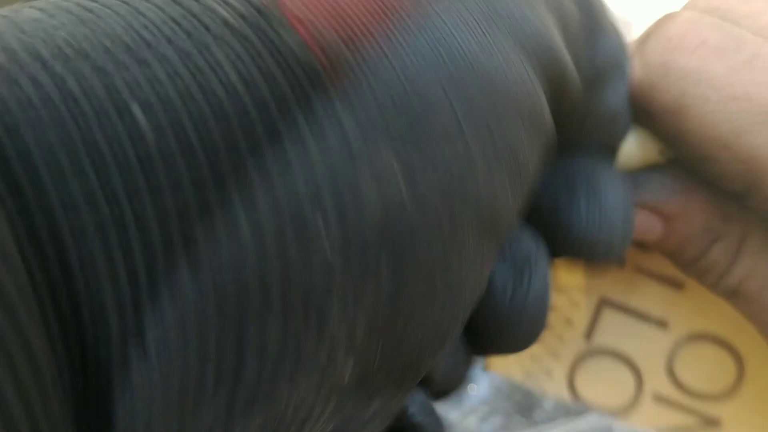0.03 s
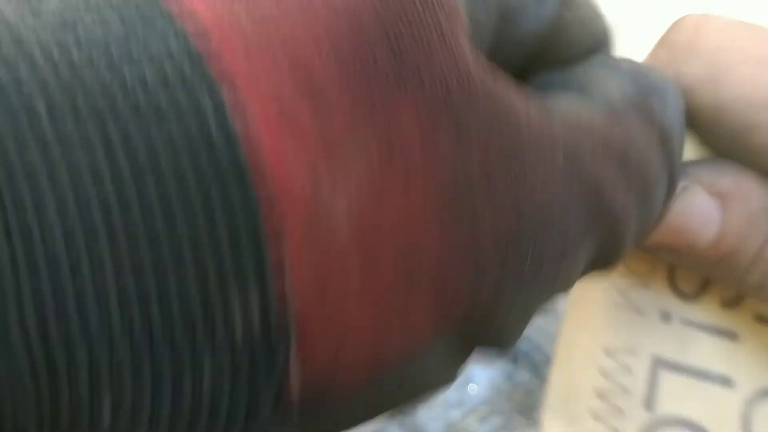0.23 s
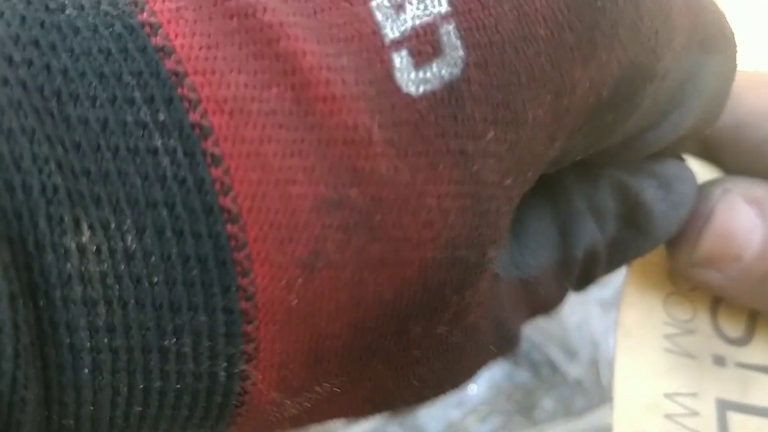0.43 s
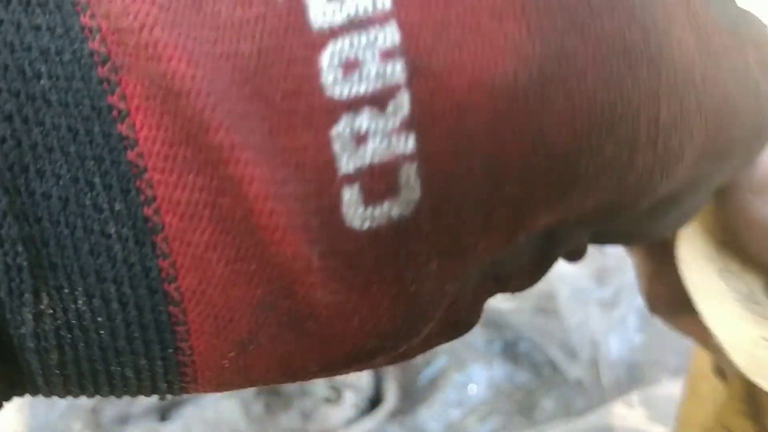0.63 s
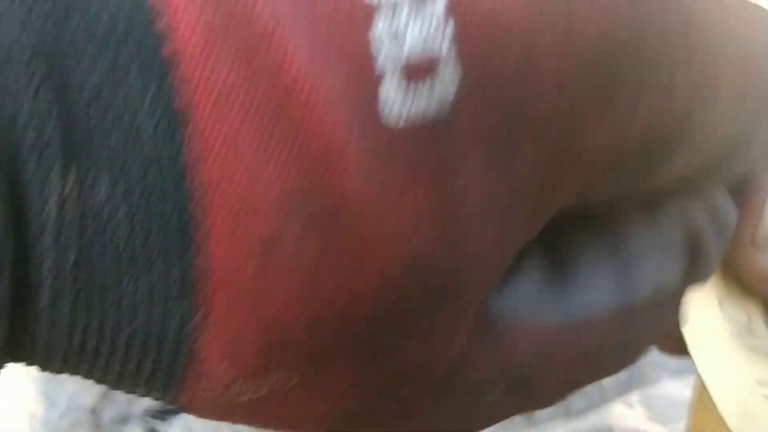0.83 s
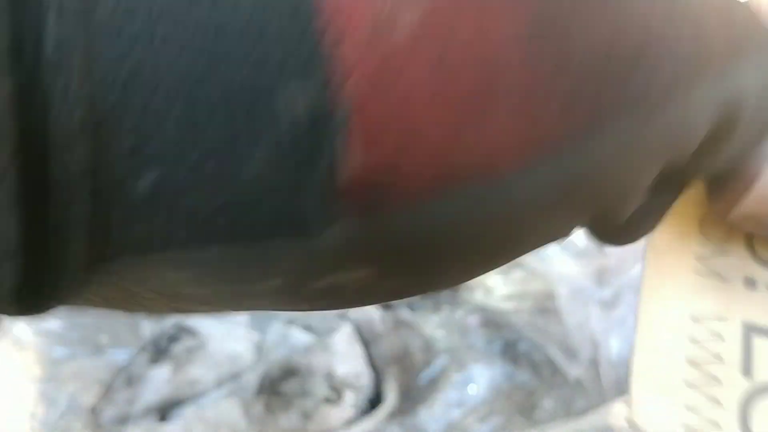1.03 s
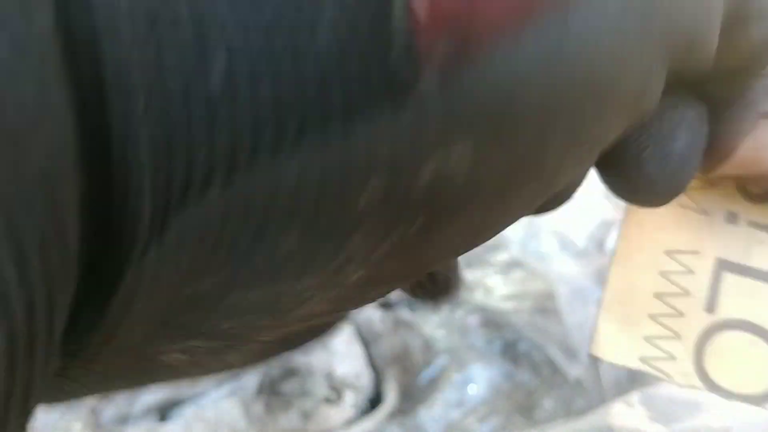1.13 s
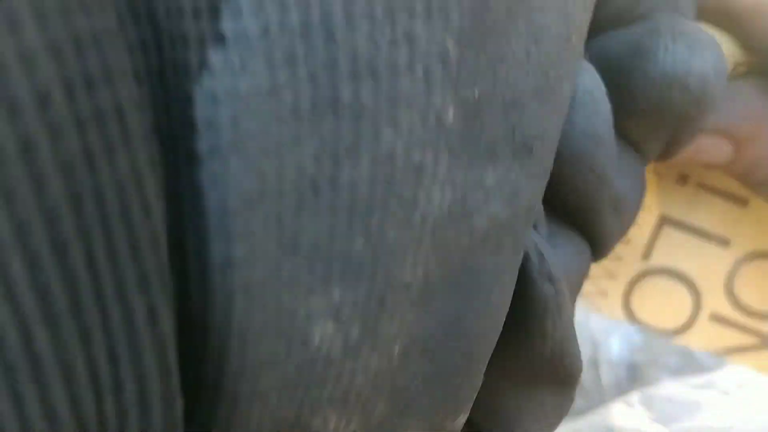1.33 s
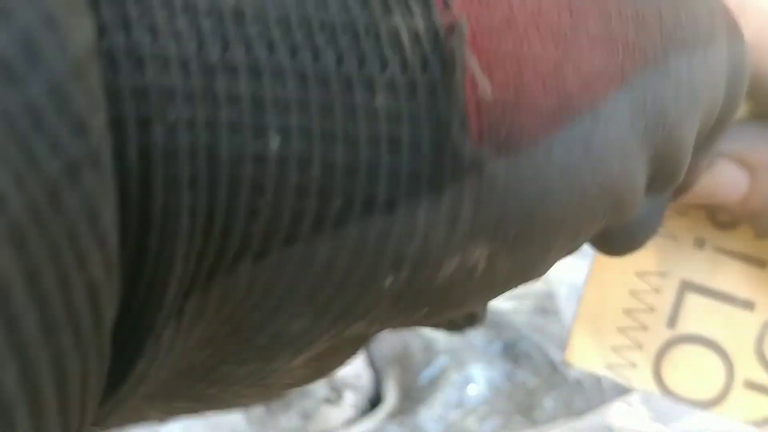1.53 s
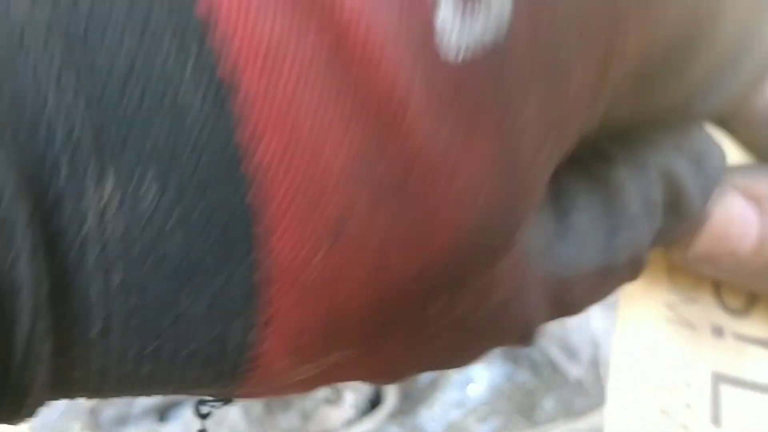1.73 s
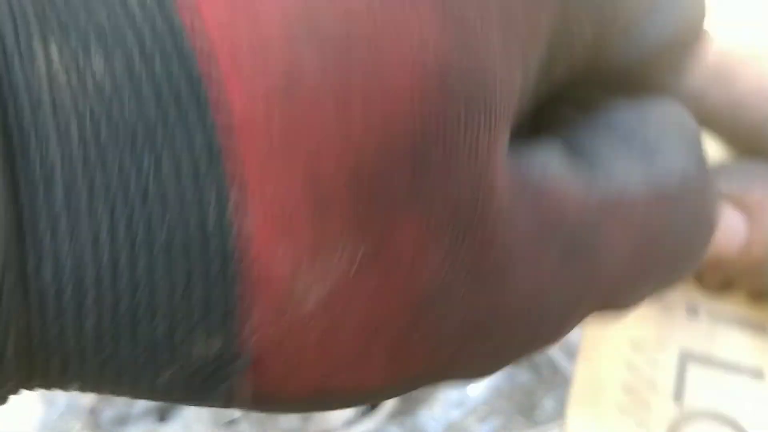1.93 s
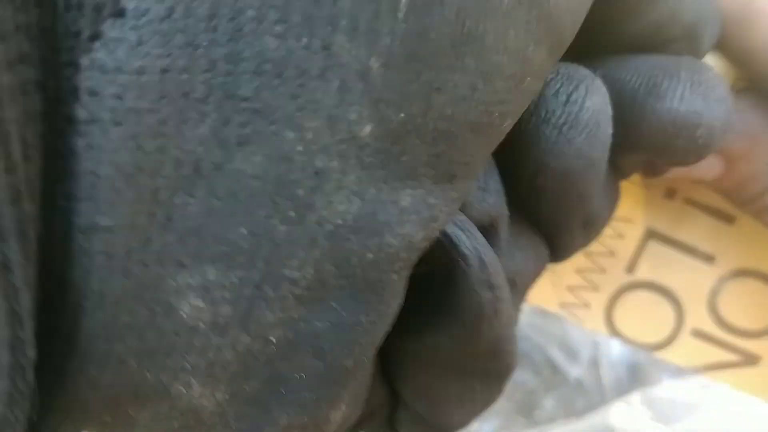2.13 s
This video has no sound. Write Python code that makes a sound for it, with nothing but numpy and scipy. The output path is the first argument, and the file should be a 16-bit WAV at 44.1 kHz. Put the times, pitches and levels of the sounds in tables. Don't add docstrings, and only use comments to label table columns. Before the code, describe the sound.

Fine sandpaper rubs a steel pin held in a gloved hand, very close in stereo. Gritty, mid-toned rasps with light hiss run from 0.05 to 0.5 s, with a brief dip near 0.2. Softer rubbing and dull glove thumps follow around 0.6-0.75, then scrapes at 0.87-1.4, a stuttering creep, a long stroke at 1.5-1.8, a quick bite at 1.83, and a strong last stroke at 1.9-2.17. Faint garage hush fills the gaps.

```python
import sys
import numpy as np
from scipy import signal
from scipy.fft import rfft, irfft
from scipy.io import wavfile

SR = 44100
rng = np.random.default_rng(int(sys.argv[2]) if len(sys.argv) > 2 else 0)


def to_wav(sig):
    pcm = np.clip(np.atleast_2d(sig), -1, 1) * 32767
    pcm = np.round(pcm).astype(np.int16)
    wavfile.write(sys.argv[1], SR, pcm.T)


def gain_from_decibels(decibels):
    exponent = np.asarray(decibels, float) / 20
    return 10 ** exponent


N = 96182
TIME_S = np.arange(N) / SR


def rms_one(x):
    return x / np.sqrt(np.mean(x ** 2) + 1e-20)


def at_hz(points, hz):
    table_hz, table_db = np.transpose(points)
    return np.interp(np.log(hz), np.log(table_hz), table_db)


def drift(rate_hz):
    r = np.exp(-40 * np.pi * rate_hz / SR)
    noise = rng.standard_normal(N // 20 + 3002)
    slow = signal.lfilter([1], [1, -2 * r, r * r], noise)[3000:]
    return np.interp(np.arange(N) / 20, np.arange(len(slow)), rms_one(slow))


def resonance(x, hz, width_hz):
    r = np.exp(-np.pi * width_hz / SR)
    top = np.array([1, 0, -1]) * (1 - r * r) / 2
    return signal.lfilter(top, [1, -2 * r * np.cos(2 * np.pi * hz / SR), r * r], x)


def pan(side_db):
    return gain_from_decibels(np.array([[0.5], [-0.5]]) * side_db)


def pair(near, far, alike, side_db):
    right = alike * near + np.sqrt(1 - alike ** 2) * far
    return np.array([near, right]) * pan(side_db)


def coloured(x, gains_db):
    hz = np.maximum(np.arange(N // 2 + 1) * SR / N, 10)
    return irfft(rfft(x) * gain_from_decibels(gains_db(hz)), N)


# start_s, level_db, grip_db, speed_db
TWISTS = [
    (0.0, -57, -9, -17),
    (0.028, -55, -4, -20),
    (0.034, -52.5, -9, -17),
    (0.048, -34.5, -19, -18),
    (0.054, -50, -3.5, -18),
    (0.102, -31, -14.5, -19.5),
    (0.15, -32, -12, -14),
    (0.19, -49, -10, -16.5),
          (0.195, -42, -8, -13.5),
    (0.245, -33, -10.5, -16),
    (0.295, -40.5, -10.5, -13.5),
    (0.309, -33.5, -15, -16.5),
    (0.395, -36.5, -9, -11.5),
    (0.433, -32, -19, -11),
    (0.475, -36.5, -8, -10),
    (0.493, -69, 5, -9),
    (0.529, -56.5, -13, -8),
          (.535, -68, -12, -6),
    (.553, -58, -5, -13),
    (0.564, -45.5, -12.5, -13),
    (0.648, -36.5, -7, -8.5),
    (0.708, -40, -7.5, -9.5),
    (0.723, -52.5, -5, -11),
    (.769, -47, -6.5, -12),
    (.783, -68.5, 2, -11),
    (.82, -69, 0, -10),
          (0.835, -66, -13, -20),
    (0.85, -55, -12, -20),
    (0.881, -42, -14, -8.5),
    (0.955, -44.5, 0, -7),
    (0.978, -35.5, -15, -10),
    (1.093, -39, -6, -11.5),
    (1.116, -29, -19.5, -10),
    (1.126, -40, -7, -17.5),
    (1.141, -36.5, -11.5, -9.5),
    (1.18, -41.5, -7, -9.5),
          (1.185, -45.5, -3, -10),
    (1.205, -31.5, -13, -12.5),
    (1.239, -42.5, -8, -15),
    (1.293, -30.5, -16.5, -14),
    (1.319, -32, -12.5, -11),
    (1.353, -29.5, -14.5, -12.5),
    (1.387, -40.5, -10.5, -17.5),
    (1.401, -58.5, 5, -6),
    (1.42, -65, -10, -12),
          (1.425, -68, 0, -10),
    (1.461, -49, -13, -18.5),
    (1.497, -55, -7, -21),
          (1.501, -33.5, -21, -19.5),
    (1.522, -41, -15, -16),
    (1.568, -31.5, -11.5, -18),
    (1.628, -35, -14, -18.5),
    (1.66, -35, -20, -16),
    (1.728, -31, -13, -15.5),
    (1.755, -33, -23, -11),
    (1.795, -34, -16.5, -10.5),
    (1.815, -56.5, -15, -22),
          (1.819, -65, -6, -33),
    (1.826, -34.5, -24, -8),
    (1.865, -47.5, -7, -13.5),
    (1.876, -66, -10, 8),
    (1.885, -71, -14, -10),
          (1.89, -58, -11, -6),
    (1.901, -36.5, -16, -10.5),
    (1.97, -33, -24.5, -8.5),
    (2.035, -35.5, -5, -10.5),
    (2.066, -29, -20, -14),
    (2.126, -31.5, -18, -10.5),
    (2.149, -34, -16, -15),
    (2.168, -53, -3, -12),
    (2.18, -48, -10, -14),
]


def hand_motion():
    strokes = np.array(TWISTS)
    start_s, *controls = strokes.T
    level_db, grip_db, speed_db = [np.interp(TIME_S, start_s, c) for c in controls]
    return level_db, grip_db + 11, speed_db + 14


def grains():
    grains_per_s, spread_db = 18000, 1.8
    sizes = gain_from_decibels(spread_db * np.minimum(rng.exponential(1, N), 5))
    struck = rng.random(N) < grains_per_s / SR
    return rms_one(sizes * struck * rng.standard_normal((4, N)))


# start_s, peak_db, fade_s (time to fall 60 dB)
CATCHES = [(0.033, -19, 0.035), (0.045, -42, 0.03), (0.057, -12, 0.066), (.065, -21, 0.016),
           (0.073, -22, .04), (0.094, -23, 0.037), (.176, -19, 0.023), (.183, -15, 0.021),
           (.196, -14.5, 0.032), (.213, -10, 0.024), (0.226, -11.5, .03), (0.274, -10, .015),
           (0.303, -14.5, 0.045), (0.363, -13, 0.034), (0.382, -13, 0.01), (0.402, -15, 0.032),
           (.564, -24, .03), (0.586, -17, 0.035), (.66, -23, .02), (.735, -21, 0.059), (.759, -21, 0.028),
           (0.864, -25, .02), (0.87, -17, 0.027), (.954, -17, 0.022), (1.038, -22, 0.025),
           (1.1, -16.5, 0.039), (1.108, -8, .05), (1.135, -12, .03), (1.189, -16, .04), (1.228, -14, .02),
           (1.247, -15, 0.037), (1.255, -24, 0.011), (1.27, -25, 0.027), (1.279, -15, 0.041),
           (1.716, -32, 0.0087), (2.05, -12.5, .012), (2.146, -16, .02), (0.547, -33, 0.024),
           (0.856, -39, 0.058), (1.204, -33, 0.03), (1.444, -23.5, 0.022), (1.453, -26, 0.028),
           (1.464, -20, 0.031), (1.474, -19.5, 0.048), (1.485, -22, 0.042), (1.499, -7, 0.023),
           (1.511, -9, 0.067), (1.527, -19, 0.089), (1.543, -12, 0.037), (1.825, -32, 0.03),
           (1.902, -20, 0.012), (1.908, -42, 0.03), (2.134, -6, 0.022)]


def snags():
    share_db, attack_s = -20, 0.00014
    out = np.zeros(N)
    for start_s, peak_db, fade_s in CATCHES:
        age = np.maximum(TIME_S - start_s, 0)
        out += gain_from_decibels(peak_db + share_db - 60 * age / fade_s) * (1 - np.exp(-age / attack_s))
    return out


def slips(level_db):
    slips_per_s, fade_s, usual_share, slow_below_db = 260, 0.002, 0.42, -41.5
    jumps = rng.uniform(0.75, 1, N) * (rng.random(N) < slips_per_s / SR)
    saw = signal.lfilter([1], [1, -np.exp(-1 / (fade_s * SR))], jumps)
    share = np.clip(usual_share + 0.16 * np.maximum(slow_below_db - level_db, 0), 0, 0.9)
    return np.sqrt(1 - share + share * np.minimum(saw / saw.mean(), 2))


# free_s, loss_db, length_s
STICKS = [(0.062, 6, .006), (0.071, 8, 0.0047), (0.198, 5, 0.0062), (0.298, -0.5, 0.027),
          (0.36, 12.5, 0.0088), (1.9, 7, 0.0088), (1.224, 5, 0.0044), (1.247, 1, 0.008), (1.266, 7, 0.0072),
          (1.526, 9, 0.0054), (1.628, 5, 0.005), (1.909, 19, 0.006)]


def stalls():
    loss_db = 0
    for free_s, db, length_s in STICKS:
        sinking = np.clip(2 - 2 * (free_s - TIME_S) / length_s, 0, 1)
        loss_db = loss_db + db * sinking * (TIME_S < free_s)
    return gain_from_decibels(-loss_db)


def scrape_pressure(level_db):
    chatter_db = 0.7 * drift(80)
    steady = gain_from_decibels(level_db + chatter_db) * slips(level_db)
    return np.hypot(steady, snags()) * stalls()


# start_s, paper_flap_db, free_pin_db, open_fist_db, turned_left_db
WRAPPING = [(.05, 3, -5.8, -5.2, 2), (.15, 0.5, -6.5, -5.2, 2), (.3, 3.1, -2, 1, 1),
            (.45, 2.5, 0.2, 3, 0.8), (.65, -1, 2, -2.5, -0.5), (.9, 4, 4, 0.7, 1), (1.05, -2, 5, 0.9, -2.5),
            (1.2, 5, 2.5, 1, -0.5), (1.33, 4.5, 1.7, 2.3, 0.5), (1.55, 0.5, -3.5, -3.6, 1.5),
            (1.7, 1, -3.5, -2.5, 1.9), (1.849, 6.5, 2.5, 2.4, -0.5), (1.97, 6, -0.5, 3, 0.2),
            (2.1, 1, 3, 3.5, 0.5)]


def wrapping():
    start_s, *columns = np.transpose(WRAPPING)
    return [np.interp(TIME_S, start_s, c) for c in columns]


# pitch_hz, width_hz, level_db, left_minus_right_db, left_right_likeness (-1 to 1)
BODY_MODES = [(263, 190, 0, -3.5, 0.91), (512, 387, -3.5, -4, 0.75), (692, 350, -1, -1.5, 0.95),
              (847, 320, 0, 1, 0.89), (1091, 500, -10, -10, .9), (1526, 588, 1.5, 9.5, 0.71),
              (1980, 240, 4.5, -2, -0.6), (2302, 153, -6.5, 24.5, 0), (2652, 517, 3.5, 4.5, 0.52),
              (2644, 175, -2.5, 8, 0.5), (1630, 200, 0.4, 3.5, 0.1), (3010, 600, -4, 15, 1),
              (3605, 640, -11.5, 19, 0.5), (4160, 540, -6, 4, 0.3)]


def body(ticks, grip_db, paper_db, pin_db, cup_db):
    out = 0
    for k, (hz, width_hz, db, side_db, alike) in enumerate(BODY_MODES):
        extra_db = grip_db * np.clip(np.log2(990 / hz), 0, 1)
        extra_db = extra_db + paper_db * (600 < hz < 1100)
        extra_db = extra_db + pin_db * (1400 < hz < 2100)
        extra_db = extra_db + cup_db * (2200 < hz < 3300)
        wobble_db = 1.5 * drift(12)
        first = 2 * (k % 2)
        drive = pair(ticks[first], ticks[first + 1], alike, side_db) * gain_from_decibels(extra_db + wobble_db)
        ring = resonance(resonance(drive, hz, width_hz), hz, width_hz)
        out = out + gain_from_decibels(db + 9.5) * ring
    return out


def rumble(ticks, grip_db):
    shaken = pair(ticks[3], ticks[0], 0.85, -5.5) * gain_from_decibels(0.98 * grip_db)
    return signal.lfilter(*signal.butter(1, 121, fs=SR), shaken)


# pitch_hz, level_db (per Hz)
GRIT_COLOUR = [(3000, 18), (4200, 4), (5300, 8.5), (8000, 0.5), (11000, -5), (16000, -11)]
# pitch_hz, left_minus_right_db
GRIT_LEAN = [(3000, 1.8), (6000, 2.6), (9000, 10.9), (15000, 15.7)]
HISS_CORNERS_HZ = [3600, 5000, 6300, 8000, 11000, 16000]


def hiss(ticks, pressure):
    grain_share, likeness, patch_db = 0.82, 0.24, 1.1
    smooth = np.sqrt(1 - grain_share ** 2) * rng.standard_normal((2, N))
    fine = (grain_share * ticks[1:3] + smooth) * pressure
    both = pair(*fine, likeness, 0)
    hz = np.arange(N // 2 + 1) * SR / N
    out = 0
    for hump in np.eye(len(HISS_CORNERS_HZ))[1:]:
        patchy = both * gain_from_decibels(patch_db * drift(18))
        out = out + rfft(patchy) * np.interp(hz, HISS_CORNERS_HZ, hump)
    half = np.array([[0.5], [-0.5]])
    return coloured(irfft(out, N), lambda f: at_hz(GRIT_COLOUR, f) + half * at_hz(GRIT_LEAN, f))


# start_s, peak_db, pitch_hz, fade_s (time to fall 60 dB)
GLOVE_SLIPS = [
    (0.606, -42, 284, 0.069),
    (.635, -51, 300, .03),
    (0.662, -45, 270, 0.039),
    (0.673, -32, 250, 0.049),
    (0.709, -46.5, 237, 0.098),
    (.385, -39, 286, 0.062),
    (1.566, -56, 265, .04),
]


def thumps():
    rise_s, out = 0.004, 0
    for start_s, peak_db, hz, fade_s in GLOVE_SLIPS:
        age = np.maximum(TIME_S - start_s, 0)
        loudness = gain_from_decibels(peak_db + 6.5 - 60 * age / fade_s) * (1 - np.exp(-age / rise_s))
        out = out + loudness * np.sin(2 * np.pi * hz * age)
    return out * gain_from_decibels(np.array([[-1.2], [1.2]]))


def sanding():
    level_db, grip_db, speed_db = hand_motion()
    paper_db, pin_db, cup_db, turn_db = wrapping()
    pressure = scrape_pressure(level_db)
    grit = grains()
    ticks = grit * pressure
    ringing = body(ticks, grip_db, paper_db, pin_db, cup_db) + rumble(ticks, grip_db) + thumps()
    low_cut = signal.butter(2, 175, "high", fs=SR, output="sos")
    ringing = signal.sosfilt(low_cut, ringing)
    return (ringing + hiss(grit, pressure * gain_from_decibels(speed_db - 11))) * pan(turn_db)


ECHO_DELAYS_S = [.0031, .0074, .0133, .021]


def garage(x):
    out = np.zeros_like(x)
    for k, delay_s in enumerate(ECHO_DELAYS_S):
        lag = int(delay_s * SR)
        out[:, lag:] += gain_from_decibels(-25 - k) * x[::-1, :-lag]
    return out


# pitch_hz, level_db (per Hz)
HUSH_COLOUR = [(25, -22), (60, 2), (114, -1), (250, -12), (840, 4.5), (1700, -8), (4000, -5), (16000, -19)]


def hush():
    near, far = rng.standard_normal((2, N))
    noise = coloured(pair(near, far, 0.85, 0), lambda hz: at_hz(HUSH_COLOUR, hz))
    return gain_from_decibels(-69.5) * rms_one(noise)


def scene():
    scrape = sanding()
    return scrape + garage(scrape) + hush()


def top_cut(x):
    return signal.sosfilt(signal.butter(12, 16360, fs=SR, output="sos"), x)


def record(dry):
    mix = coloured(dry, lambda hz: -80.0 * (hz > 15830))
    return top_cut(mix)


dry = scene()
out = record(dry)
to_wav(out)
```